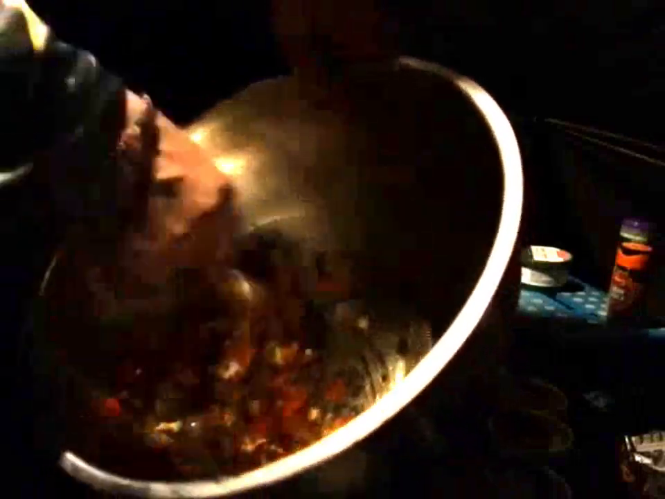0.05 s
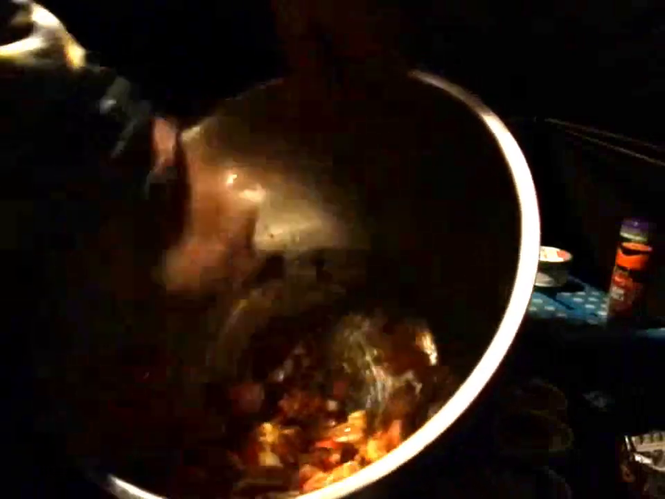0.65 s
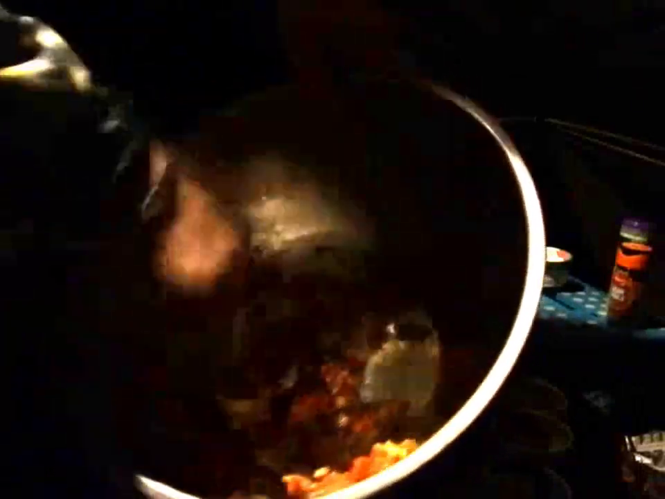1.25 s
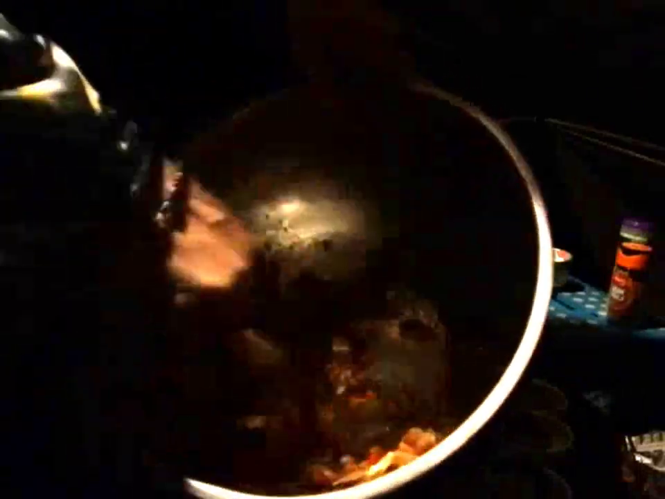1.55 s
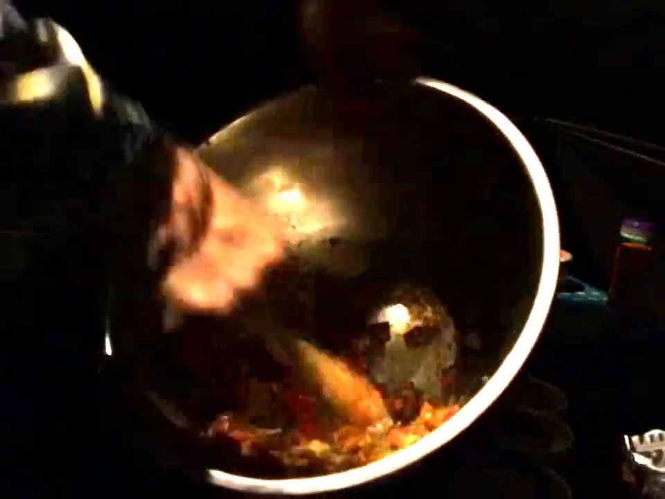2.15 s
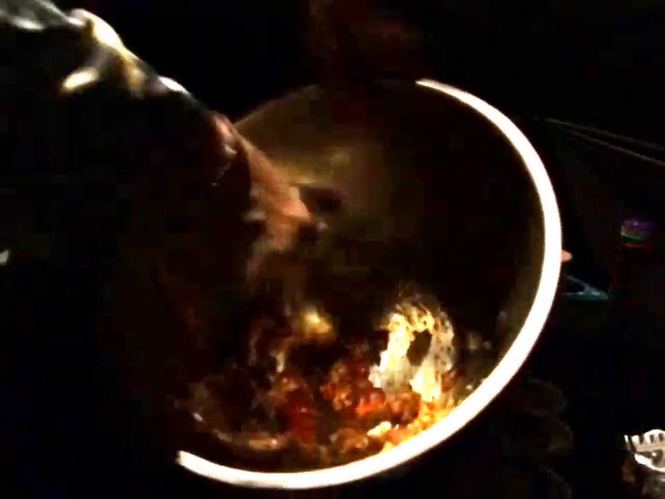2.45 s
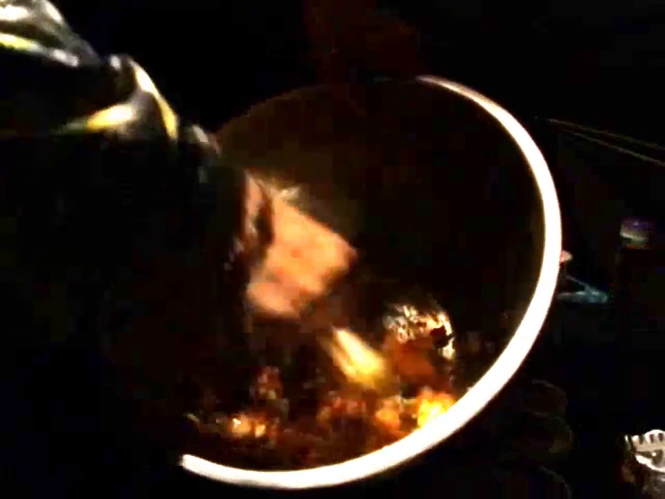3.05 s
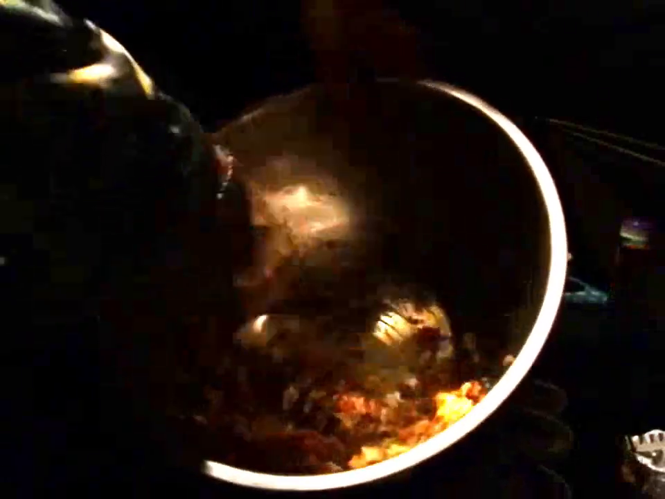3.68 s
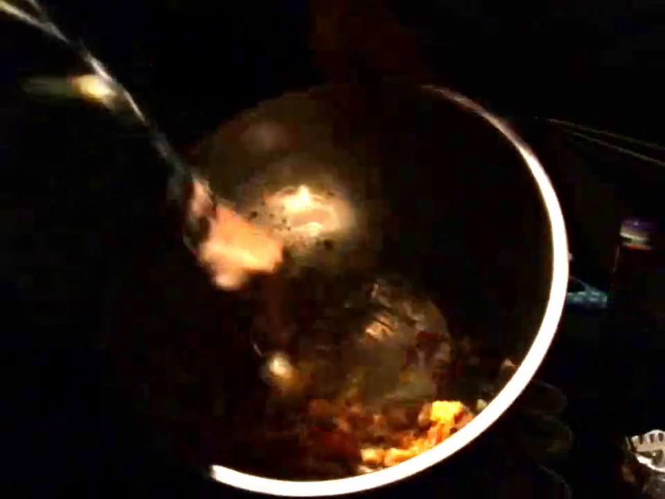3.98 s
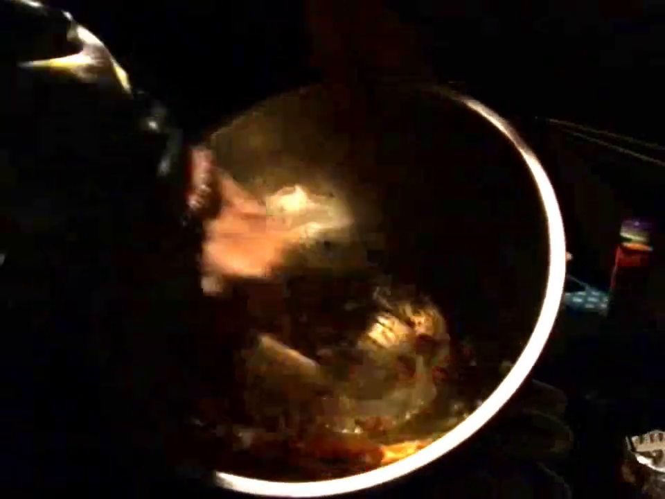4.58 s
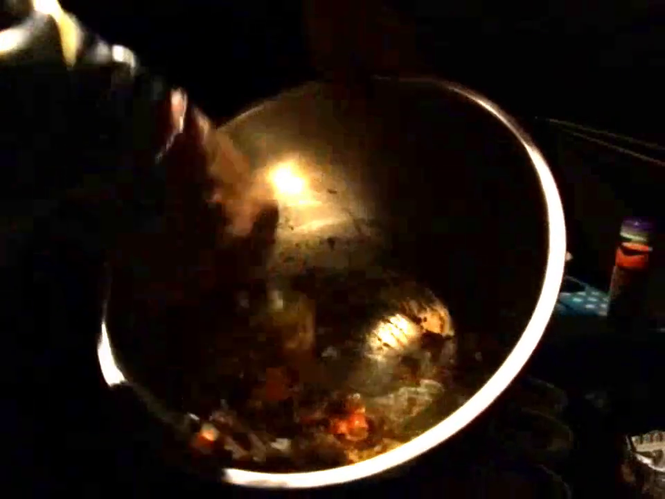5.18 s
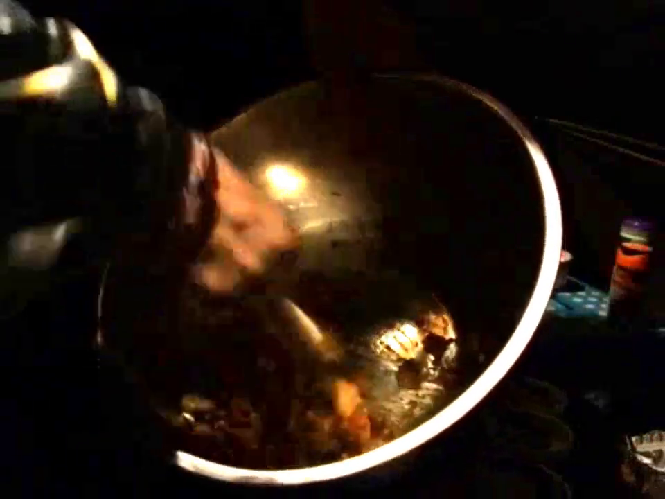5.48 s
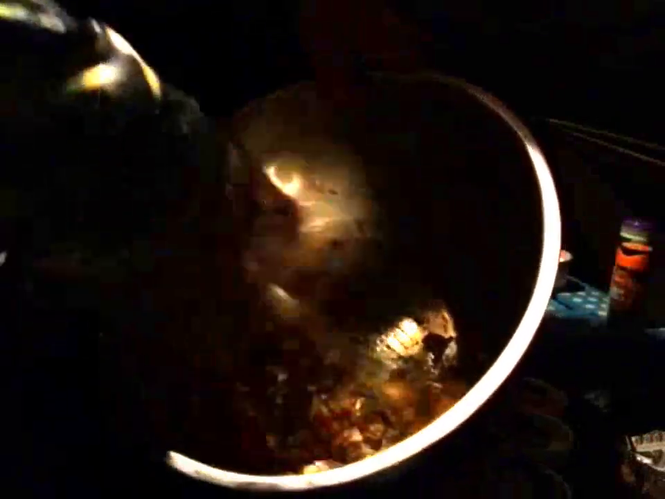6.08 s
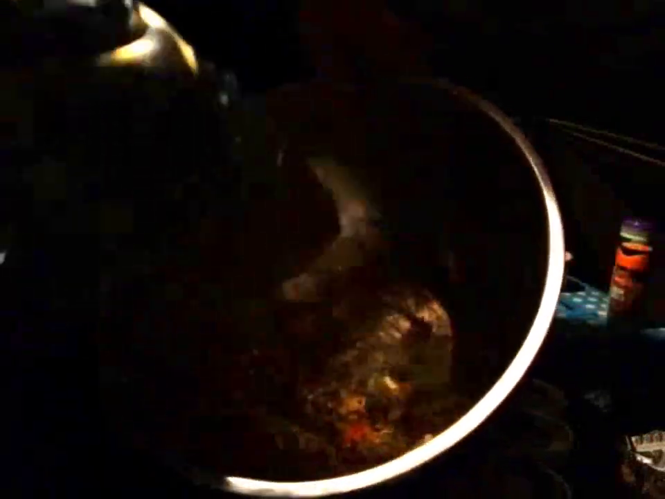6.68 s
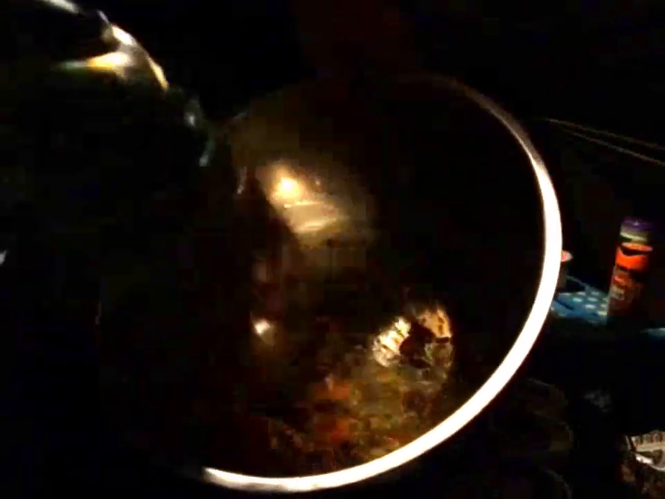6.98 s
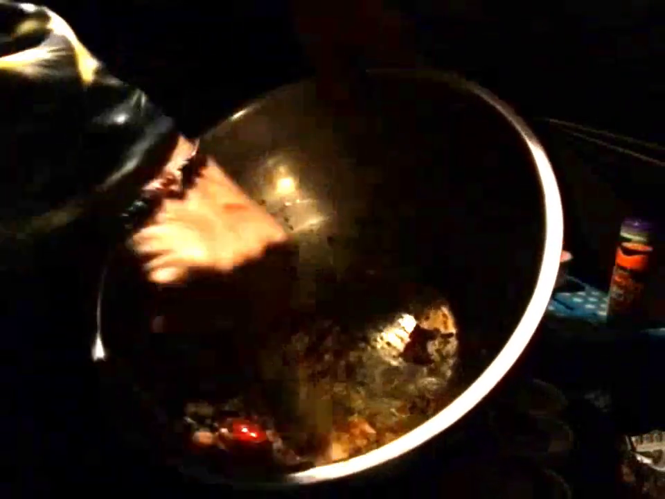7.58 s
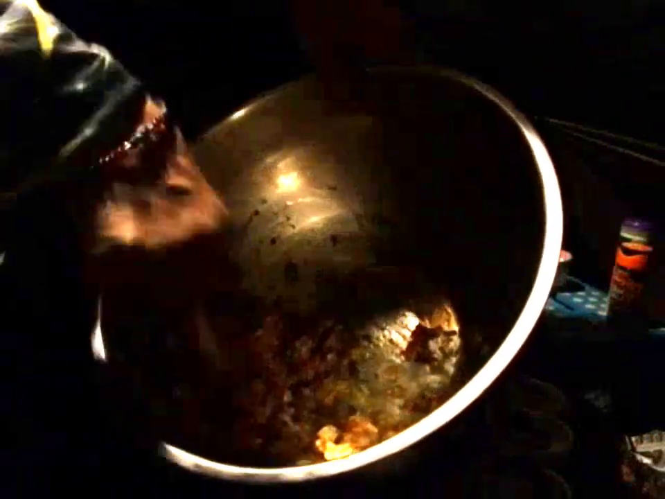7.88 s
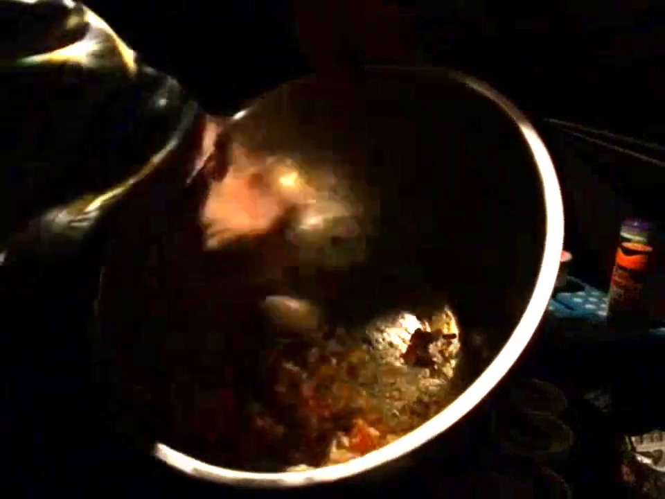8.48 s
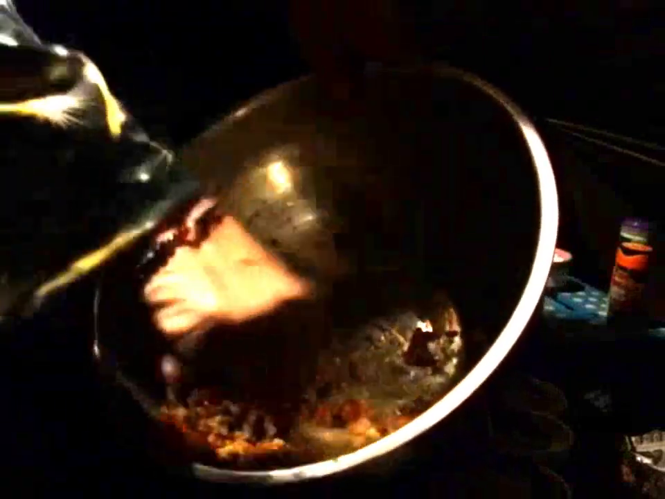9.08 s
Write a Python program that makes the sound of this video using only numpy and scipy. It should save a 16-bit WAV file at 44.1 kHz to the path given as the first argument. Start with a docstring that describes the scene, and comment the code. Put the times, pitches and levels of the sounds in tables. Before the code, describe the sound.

Thick food is stirred briskly in a steel bowl, the spoon giving uneven clanks and dull thuds between gritty, wet scrapes.

```python
"""Outdoors on a still night: a metal spoon stirs a thick, chunky mixture in a hand-held steel bowl.
Knocks ring the food-damped wall, the bottom and the spoon; landings in the mixture thud.
Between blows the spoon scrapes grittily, bare steel squeals and hisses, the food squishes and crunches.
Handling rumbles faintly underneath. No reverberation."""
import sys
import numpy as np
from scipy import signal
from scipy.fft import rfft, irfft
from scipy.io import wavfile
from scipy.ndimage import uniform_filter1d, map_coordinates

SR = 44100
rng = np.random.default_rng(int(sys.argv[2]) if len(sys.argv) > 2 else 0)


def bounce(signal):
    """Save signal as a 16-bit WAV file at the path given by the first command-line argument."""
    frames = np.transpose(np.atleast_2d(signal))
    limited = np.clip(frames, -1, 1)
    pcm = np.round(limited * 32767).astype(np.int16)
    wavfile.write(sys.argv[1], SR, pcm)


N = 411894
AGE_S = np.arange(SR // 2) / SR  # time since a blow
BLOW_S, USUAL_DB = 0.02, -35  # reference duration and level of a blow

# spoon on the wall, pitch rising with height: t/s, clank/dB, centre f/Hz, edge click/dB, spoon ting/dB
KNOCKS = [(0.2399, -25, 1050, -27.5, -68), (0.4814, -31.5, 1080, -30, -51.5),
          (1.6677, -31.5, 1020, -32.5, -29.5), (1.8475, -47.5, 1280, -37.5, -63.5),
          (2.1446, -47.5, 1150, -37, -57.5), (2.2154, -34, 990, -32.5, -46),
          (2.3844, -37.5, 1110, -28.5, -56.5), (2.7054, -26.5, 1030, -28, -49),
          (3.2878, -40.5, 990, -35.5, -49), (3.4058, -55, 1220, -43, -70),
          (3.5673, -27.5, 1030, -30, -33.5), (3.8547, -40.5, 1060, -36.5, -54.5),
          (4.3048, -38.5, 1150, -37.5, -50), (4.59, -32, 1200, -32.5, -40.5), (4.703, -51, 1020, -51, -58),
          (4.8689, -47, 1280, -44.5, -69), (5.142, -49.5, 1160, -44.5, -53.5),
          (5.4342, -25.5, 1215, -26, -55.5), (5.7067, -36.5, 994, -37.5, -58),
          (5.9686, -29.5, 990, -32, -45.5), (6.231, -41.5, 1070, -54, -54.5),
          (6.2579, -29, 970, -32, -36.5), (6.562, -40, 1096, -40, -47.5), (6.7195, -49, 1190, -43.5, -66.5),
          (6.9761, -36.5, 1307, -31, -44.5), (7.1373, -33, 980, -35.5, -46),
          (7.2764, -30, 1457, -27, -38.5), (7.544, -43, 1170, -55, -66), (8.1036, -27, 1410, -23.5, -44.5),
          (8.413, -28, 1050, -31, -60.5), (8.6875, -30, 1035, -32, -48.5), (8.9178, -52.5, 1440, -45, -62),
          (9.2377, -39, 1220, -32.5, -53)]
# spoon landing in the mixture: t/s, thud/dB, f/Hz, t60/s, wall clank/dB, spoon ting/dB, edge click/dB
THUDS = [(0.698, -26.5, 420, 0.031, -44.5, -37.5, -36.5), (0.768, -26.5, 426, 0.0074, -32, -32.5, -31.5),
         (1.0077, -26, 480, 0.01, -46.5, -43.5, -36), (1.3075, -20, 417, 0.021, -35.5, -44, -27),
         (1.38, -36, 477, 0.0057, -55, -48, -47.5), (1.6322, -18.5, 410, 0.023, -52, -39, -34),
         (1.9261, -29.5, 424, 0.0083, -61, -44.5, -38.5), (2.945, -27, 439, 0.048, -39.5, -38.5, -32),
         (3.2247, -25.5, 449, 0.043, -42.5, -41.5, -43), (3.5107, -32, 442, 0.029, -40.5, -44.5, -36.5),
         (3.782, -25.5, 457, 0.036, -34, -44, -31.5), (4.0712, -22.5, 461, 0.022, -34.5, -41.5, -27.5),
         (4.376, -20, 425, 0.072, -54, -39.5, -34), (6.5105, -19.5, 516, 0.024, -35.5, -39.5, -33.5),
         (6.76, -22.5, 490, 0.0079, -40, -41, -28)]
# scrape spectrum: f/Hz, level/dB
GRIT_SPECTRUM = [(300, -13), (1000, -21), (1700, -4), (2800, -1.5), (4000, 1.5), (6000, -0.5), (7100, -13),
                 (9000, -7), (12500, -5.5), (16000, -14)]


def contacts():
    """Excitation per blow: t/s, boom/dB, clank/dB, centre f/Hz, ting/dB, tick/dB, shimmer/dB, skid/dB."""
    # only the spoon's edge catches: t/s, click/dB
    edge_clicks = [(1.1743, -40), (2.5002, -36.5), (3.1467, -29)]
    upper_wall_hz = 1290
    rows = []
    for s, clank_db, hz, click_db, ting_db in KNOCKS:
        # boom grows more slowly than clank and fades on the upper wall
        octaves_up = max(np.log2(hz / upper_wall_hz), 0)
        boom_db = -34.5 + 0.56 * (clank_db - USUAL_DB) - 56.5 * octaves_up
        rows.append((s, boom_db, clank_db, hz, ting_db, click_db))
    for s, *_, clank_db, ting_db, click_db in THUDS:
        rows.append((s, clank_db - 1, clank_db, 1170, ting_db, click_db))
    for s, click_db in edge_clicks:
        rows.append((s, click_db - 35.5, click_db - 25.5, 1200, click_db - 26, click_db))
    drag_db, out = drag_level_db(), []
    for s, boom_db, clank_db, hz, ting_db, click_db in rows:
        # click splits into tick and shimmer: more shimmer on the bare upper wall, less when pressed hard
        share_db = -4.5 + 13.5 * np.log2(hz / 1100) - 0.57 * (click_db - USUAL_DB)
        tick_db = click_db - 10 * np.log10(1 + from_db(share_db) ** 2)
        skid_db = drag_db[int(s * SR)] + 17
        out.append((s, boom_db, clank_db, hz, ting_db, tick_db, tick_db + share_db, skid_db))
    return out


def knocks(focus_db_per_octave, rattle_db, rattle_t60_s, sing_db):
    """Bowl and spoon ring together; the spot struck favours wall modes near one pitch."""
    # bowl modes: f/Hz, level/dB, t60/s
    bowl_modes = [(376, -6.5, .075), (510, 0, .018), (700, -4, .016), (1010, -2, .014), (1150, -3, .02),
                  (1330, -5, .02), (1590, -3, .024)]
    # spoon modes, two damped, then those that sing on: f/Hz, level/dB, t60/s
    spoon_modes = [(1990, -3.5, .041), (2284, -.5, .05), (2255, 0, .29), (2338, -4, .26), (2400, 7, .1)]
    boom_top_hz = 800
    bottom_modes = [row for row in bowl_modes if row[0] < boom_top_hz]
    out, bottom = np.zeros((2, N))
    for s, boom_db, clank_db, centre_hz, ting_db, _, shimmer_db, _ in contacts():
        wall_modes = [(hz, db - focus_db_per_octave * abs(np.log2(hz / centre_hz)), t60_s)
                      for hz, db, t60_s in bowl_modes if hz >= boom_top_hz]
        add(bottom, s, blow(struck(bottom_modes, spread_db=1.7, detune=0.57), boom_db))
        add(out, s, blow(struck(wall_modes, spread_db=2.5, detune=0.62), clank_db))
        add(out, s, blow(burst(low_hz=650, high_hz=1900, t60_s=rattle_t60_s), clank_db + rattle_db))
        add(out, s, blow(struck(spoon_modes[:2], spread_db=4, detune=2), ting_db))
        # the spoon sings when hit hard with no food deadening the steel
        singing = struck(spoon_modes[2:], spread_db=2, detune=3)
        add(out, s, blow(singing, (2 * ting_db + shimmer_db) / 3 + sing_db))
    return out + highpass(bottom, hz=187)


def thuds(rise_s, upper_ratio, upper_db, side_hz, side_db, slosh_db, slosh_t60_s):
    """Food-cushioned landings drive two close modes of the loaded bottom, the side wall and a slosh."""
    # lumps dropping back on the bottom: t/s, level/dB
    lumps = [(1.066, -50.5), (1.357, -42), (2.655, -44), (3.818, -50.5), (4.104, -44), (4.461, -57.5),
             (5.671, -52)]
    lump_hz, lump_t60_s = 420, 0.05
    out = np.zeros(N)
    for s, db, hz, t60_s, *_ in THUDS + [(s, db, lump_hz, lump_t60_s) for s, db in lumps]:
        bottom = mode(hz, t60_s) + from_db(upper_db) * mode(hz * upper_ratio, t60_s)
        side = from_db(side_db) * mode(side_hz, t60_s)
        attack = 1 - np.exp(-AGE_S / rise_s)
        add(out, s, blow((bottom + side) * attack, db))
        add(out, s, blow(burst(low_hz=333, high_hz=640, t60_s=slosh_t60_s), db + slosh_db))
    return highpass(out, hz=220)


def edge_clinks(bite_t60_s, chatter_t60_s, chatter_db, t60_at_5khz_s, damping, skid_s, count=260):
    """The edge skids, bites with a tick and leaves the steel's dense high modes shimmering."""
    # bite spectrum: f/Hz, level/dB
    tick_spectrum = [(1500, -8), (2200, -8), (2700, -3.5), (3300, -6), (4400, -1.5), (5500, 4),
                     (6400, -0.5), (7100, -10), (9000, -8.5), (12000, -8.5), (16000, -12)]
    # spectrum of the high modes: f/Hz, level/dB
    shimmer_spectrum = [(500, 1.5), (1600, -4), (2500, -13.5), (3400, -11), (4700, -9.5), (5700, -1),
                        (6500, -8), (7100, -8), (9000, -8), (12000, -15.5), (16000, -20.5)]
    ticks, shimmer, skids = np.zeros((3, N))
    pitches_hz = np.linspace(2400, 16000, count) + 25 * rng.standard_normal(count)
    high_modes = np.array([mode(hz, t60_at_5khz_s * (5000 / hz) ** damping) for hz in pitches_hz])
    bite = fade(bite_t60_s) + from_db(chatter_db) * fade(chatter_t60_s)
    lead_s = AGE_S[AGE_S < 0.03]
    swell = np.exp(-lead_s[::-1] / skid_s)
    for s, *_, tick_db, shimmer_db, skid_db in contacts():
        add(ticks, s, blow(rng.standard_normal(len(bite)) * bite, tick_db))
        add(shimmer, s, blow(rng.standard_normal(count) @ high_modes, shimmer_db))
        add(skids, s - lead_s[-1], from_db(skid_db) * rng.standard_normal(len(swell)) * swell)
    return (coloured(ticks, tick_spectrum)
            + from_db(-2.5) * coloured(shimmer, shimmer_spectrum)
            + from_db(0.5) * coloured(skids, GRIT_SPECTRUM))


def drag_level_db():
    """Drag level per sample; it dips as each knock bounces the spoon off the wall."""
    # spoon dragged through the food along the steel: t/s, length/s, level/dB
    drags = [(0.0, 0.068, -44.5), (0.175, .055, -44.5), (0.234, 0.0046, -39), (0.31, 0.11, -60.5),
             (0.53, 0.087, -57.5), (0.84, 0.123, -52.5), (1.02, 0.26, -48.5), (1.33, 0.087, -53.5),
             (1.47, 0.065, -59), (1.62, 0.061, -49), (1.93, 0.052, -44.5), (2.125, .04, -52),
             (2.17, 0.084, -40.5), (2.37, 0.024, -43), (2.46, 0.037, -47.5), (2.57, 0.053, -60.5),
             (2.745, .05, -49.5), (2.81, 0.054, -59.5), (2.96, .08, -52.5), (3.07, 0.06, -48.5),
             (3.24, 0.2, -58), (3.53, 0.15, -58), (3.81, 0.12, -65), (4.08, 0.031, -55), (4.38, 0.035, -50),
             (4.62, 0.13, -52.5), (4.85, 0.045, -53), (4.925, 0.063, -42), (5.0, 0.024, -50),
             (5.15, .04, -47.5), (5.195, 0.088, -39), (5.36, 0.19, -64), (5.72, 0.12, -59.5),
             (6.03, .08, -58.5), (6.3, 0.17, -66), (6.53, 0.15, -53), (6.77, 0.021, -58.5),
             (7.075, 0.082, -55), (7.35, 0.055, -49.5), (7.54, 0.049, -66.5), (7.598, .1, -44.5),
             (7.775, .05, -56), (7.853, 0.086, -40), (8.07, 0.014, -47), (8.21, 0.049, -56),
             (8.44, 0.069, -59), (8.71, 0.053, -63), (9.01, .09, -58.5), (9.32, .02, -48.5)]
    bounces = np.zeros(N)
    for s, *_ in KNOCKS:
        add(bounces, s, (1 - fade(t60_s=0.02)) * np.exp(-AGE_S / 0.037))
    level_db = strokes_db(drags, rise_db_per_s=421.5, fall_db_per_s=219.5, sag_db_per_s=13.5, grip_db=4)
    return level_db - 8 * bounces


def stirring(clump_db, squish_db, squish_growth):
    """Dragging makes wet crackle over fine hiss; the squish below grows more slowly with effort."""
    drag_db = drag_level_db()
    snaps = crackle(per_s=1800, spread_db=5.2, cycles=12, low_hz=1300, high_hz=15000, count=22)
    hiss = from_db(-3) * rng.standard_normal(N)
    clumps = from_db(clump_db * drift(per_s=150))
    grit = from_db(drag_db) * rms_one((snaps + hiss) * clumps)
    grit = wall_reflection(grit, gain=0.54, delay_s=0.000597, drift_per_s=12)
    wet = crackle(per_s=680, spread_db=3, cycles=28, low_hz=224, high_hz=2120, count=14)
    effort_db = uniform_filter1d(drag_db, SR // 25)
    squish = from_db(squish_db + squish_growth * effort_db) * wet
    # wet food spectrum: f/Hz, level/dB
    squish_spectrum = [(120, -9), (250, -1.5), (380, 6.5), (550, 2.5), (800, -4), (1150, 0.5), (1700, -9.5),
                       (3000, -10.5)]
    return coloured(grit, GRIT_SPECTRUM) + coloured(squish, squish_spectrum)


def crackle(per_s, spread_db, cycles, low_hz, high_hz, count):
    """Wet films snap and crumbs slip, each ringing briefly at one of count pitches; rms 1."""
    sizes = from_db(spread_db * np.minimum(rng.exponential(1, N), 4)) * rng.choice([-1, 1], N)
    snaps = sizes * (rng.random(N) < per_s / SR)
    pitch_index = rng.integers(0, count, N)
    pitches_hz = np.geomspace(low_hz, high_hz, count)
    rings = (hz * ring(snaps * (pitch_index == k), hz, cycles / hz) for k, hz in enumerate(pitches_hz))
    return rms_one(sum(rings))


def crunches(low_hz, high_hz, t60_s):
    """Crisp morsels crack under the spoon in short, dry bursts."""
    # morsels breaking: t/s, level/dB
    morsels = [(0.048, -41), (2.279, -41), (3.119, -43.5), (4.957, -42), (4.965, -41), (5.288, -41.5),
               (7.61, -42), (7.787, -48), (7.858, -38), (7.952, -44)]
    out = np.zeros(N)
    for s, db in morsels:
        add(out, s, blow(burst(low_hz, high_hz, t60_s), db))
    return out


def rubs():
    """Friction drives bare spoon and wall in a short, rough squeal."""
    # steel rubbing on steel: t/s, length/s, level/dB
    rub_events = [(1.021, 0.026, -59), (1.074, 0.069, -49), (5.081, 0.015, -51)]
    # resonances driven by a rub: f/Hz, level/dB, t60/s
    rub_modes = [(1150, 3.5, 0.017), (1990, -9, 0.047), (2110, 0, 0.043), (4310, -1, .018),
                 (5830, -21, .03)]
    out = np.zeros(N)
    for s, length_s, db in rub_events:
        friction = rng.standard_normal(int(length_s * SR))
        friction = np.pad(friction * np.sqrt(np.hanning(len(friction))), (0, SR // 10))
        squeal = sum(ring(friction, hz, t60_s) * from_db(mode_db) for hz, mode_db, t60_s in rub_modes)
        add(out, s, blow(squeal, db) * np.sqrt(length_s / BLOW_S))
    return out


def skating():
    """The bare edge skates over clean steel with a bright hiss."""
    # slides of the edge: t/s, length/s, level/dB
    skates = [(2.125, 0.017, -51), (2.17, 0.071, -52), (2.366, .03, -37.5), (2.47, 0.069, -56),
              (3.09, 0.046, -63), (5.2, 0.1, -49.5), (8.065, 0.046, -49.5)]
    # hiss spectrum: f/Hz, level/dB
    skate_spectrum = [(1000, -19.5), (3000, -14.5), (6000, 0), (7100, -4.5), (9000, -5.5), (13000, -2.5),
                      (16000, -9)]
    level_db = strokes_db(skates, rise_db_per_s=901, fall_db_per_s=604, grip_db=9)
    flicker_db = 4.1 * drift(per_s=130)
    return coloured(from_db(level_db + flicker_db) * rng.standard_normal(N), skate_spectrum)


def handling(holding_db, bump_s, bump_db):
    """The held bowl rumbles, more when shifted; landings jolt it and the arm bumps once."""
    # bowl shifting in the hand: t/s, length/s, level/dB
    shifts = [(0.0, 0.095, -45), (1.0, 0.45, -59), (2.05, .3, -58.5), (4.62, 0.16, -60),
              (4.96, 0.43, -52.5), (7.45, 0.35, -58.5), (7.85, 0.21, -49.5)]
    # rumble spectrum: f/Hz, level/dB
    rumble_spectrum = [(18, -9.5), (60, 0), (95, -5), (220, -11), (1000, -35)]
    shift_db = strokes_db(shifts, rise_db_per_s=49, fall_db_per_s=95)
    rumble_gain = np.hypot(from_db(holding_db), from_db(shift_db))
    out = rumble_gain * coloured(rng.standard_normal(N), rumble_spectrum)
    jolt = highpass(mode(hz=120, t60_s=0.025), hz=45.46)
    for s, *_, click_db in THUDS:
        add(out, s, blow(jolt, db=-56 + 1.9 * (click_db - USUAL_DB)))
    bump = mode(hz=55, t60_s=0.3) * (1 - fade(t60_s=0.075))
    add(out, bump_s, blow(bump, bump_db))
    return out


def night_air(level_db):
    """Faint, steady hiss of a still night."""
    # air spectrum: f/Hz, level/dB
    air_spectrum = [(30, -16), (1000, -5.5), (16000, -19)]
    return from_db(level_db) * coloured(rng.standard_normal(N), air_spectrum)


def wall_reflection(x, gain, delay_s, drift_per_s):
    """The curved wall reflects each contact; path and colour drift as the spoon travels."""
    lag = delay_s * SR * (1 + 0.6 * np.tanh(drift(drift_per_s)))
    echo = map_coordinates(x, [np.arange(N) - lag], order=3)
    return (x + gain * echo) / np.sqrt(1 + gain ** 2)


def strokes_db(rows, rise_db_per_s, fall_db_per_s, sag_db_per_s=0, grip_db=0, grip_s=0.01):
    """Level of a run of movements: each swells, grips, sags, lets go and dies away."""
    t, levels = np.arange(0, N, 32) / SR, []
    for s, length_s, db in rows:
        before_s = np.maximum(s - t, 0)
        during_s = np.clip(t - s, 0, length_s)
        after_s = np.maximum(t - s - length_s, 0)
        loose = np.minimum((before_s + after_s) / grip_s, 1)
        drop_db = rise_db_per_s * before_s + sag_db_per_s * during_s + fall_db_per_s * after_s
        levels.append(db - drop_db - grip_db * loose)
    return np.interp(np.arange(N) / SR, t, np.max(levels, axis=0))


def struck(modes, spread_db, detune):
    """Mode levels vary per blow; grip and food shift the damped modes most."""
    out = np.zeros(len(AGE_S))
    for hz, db, t60_s in modes:
        gain = from_db(db + spread_db * rng.standard_normal())
        out += gain * mode(hz + detune * rng.standard_normal() / t60_s, t60_s)
    return out


def burst(low_hz, high_hz, t60_s):
    """Decaying band noise: food and wall shaking after a blow."""
    band = signal.butter(2, [low_hz, high_hz], "band", fs=SR, output="sos")
    return signal.sosfilt(band, rng.standard_normal(len(AGE_S)) * fade(t60_s))


def mode(hz, t60_s):
    """Struck resonance."""
    return np.sin(2 * np.pi * hz * AGE_S) * fade(t60_s)


def fade(t60_s):
    """Exponential decay."""
    return np.exp(-np.log(1000) * AGE_S / t60_s)


def ring(x, hz, t60_s):
    """Resonator: a unit click leaves a decaying unit sine."""
    radius, angle = from_db(-60 / (t60_s * SR)), 2 * np.pi * hz / SR
    return signal.lfilter([0, np.sin(angle)], [1, -2 * radius * np.cos(angle), radius ** 2], x + 1e-18)


def coloured(x, spectrum, size=4096):
    """Minimum-phase filter with this spectrum; white noise keeps its power."""
    hz, db = np.transpose(spectrum)
    bins_hz = np.maximum(np.arange(size // 2 + 1) * SR / size, 1)
    gains = from_db(np.interp(np.log(bins_hz), np.log(hz), db))
    cepstrum = irfft(np.log(gains))
    cepstrum[1:size // 2] *= 2
    cepstrum[size // 2 + 1:] = 0
    response = irfft(np.exp(rfft(cepstrum)))
    return signal.oaconvolve(x, response / np.sqrt(np.sum(response ** 2)))[:N]


def highpass(x, hz):
    """Second-order high-pass: takes away the deepest bass."""
    return signal.sosfilt(signal.butter(2, hz, "high", fs=SR, output="sos"), x)


def drift(per_s):
    """Random curve through unit-variance knots."""
    knots = rng.standard_normal(N // 10)
    return np.interp(np.arange(N) / SR * per_s, np.arange(len(knots)), knots)


def blow(x, db):
    """Scale to the energy of BLOW_S seconds at this level."""
    return x * from_db(db) / np.sqrt(np.sum(x ** 2) / (BLOW_S * SR) + 1e-20)


def rms_one(x):
    """Scale to rms 1."""
    return x / np.sqrt(np.mean(x ** 2) + 1e-20)


def from_db(db):
    """Decibels to gain."""
    return 10 ** (np.asarray(db) / 20)


def add(out, s, x):
    """Mix x into out from time s."""
    at = max(round(s * SR), 0)
    out[at:at + len(x)] += x[:N - at]


def scene():
    """Blows and stirring over handling rumble and night air; mono."""
    blows = knocks(focus_db_per_octave=47, rattle_db=-14.5, rattle_t60_s=0.073, sing_db=-10.5)
    blows += thuds(rise_s=0.0035, upper_ratio=1.1, upper_db=-14.5, side_hz=648, side_db=-21.5,
                   slosh_db=-13, slosh_t60_s=0.1)
    clinks = edge_clinks(bite_t60_s=0.0042, chatter_t60_s=0.024, chatter_db=-9.5,
                         t60_at_5khz_s=0.098, damping=0.53, skid_s=0.0038)
    blows += wall_reflection(clinks, gain=0.48, delay_s=0.0012, drift_per_s=4)
    food = stirring(clump_db=4, squish_db=-34, squish_growth=0.63)
    food += crunches(low_hz=2630, high_hz=5700, t60_s=0.019)
    air = night_air(level_db=-84)
    friction = rubs() + skating()
    rumble = handling(holding_db=-69.5, bump_s=8.215, bump_db=-41)
    return (blows + food + friction + rumble + air)[None]


def record(dry):
    """Small microphone: deepest bass and extreme treble cut."""
    low_hz, high_hz = 22, 16300
    thin = signal.sosfilt(signal.butter(1, low_hz, "high", fs=SR, output="sos"), dry)
    return signal.sosfilt(signal.ellip(10, 0.1, 70, high_hz, fs=SR, output="sos"), thin)


dry = scene()
out = record(dry)
bounce(out)
```